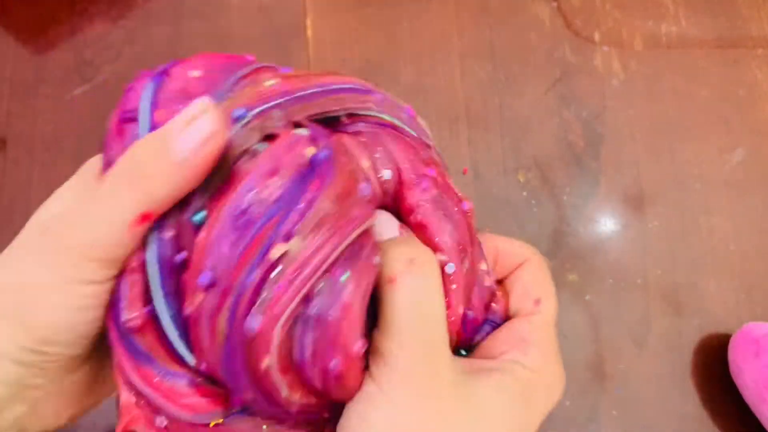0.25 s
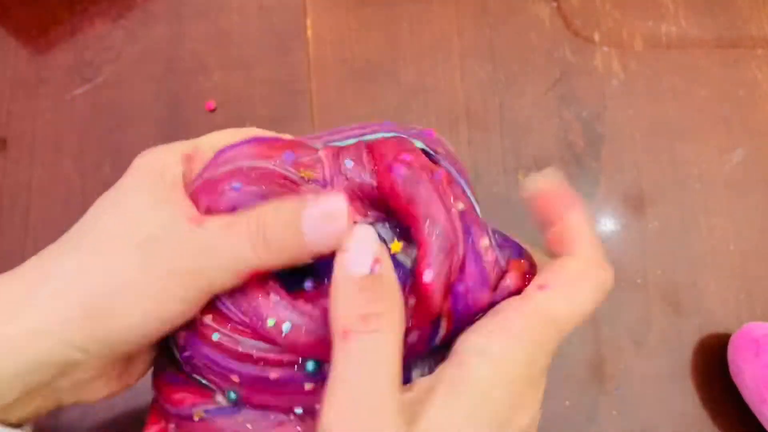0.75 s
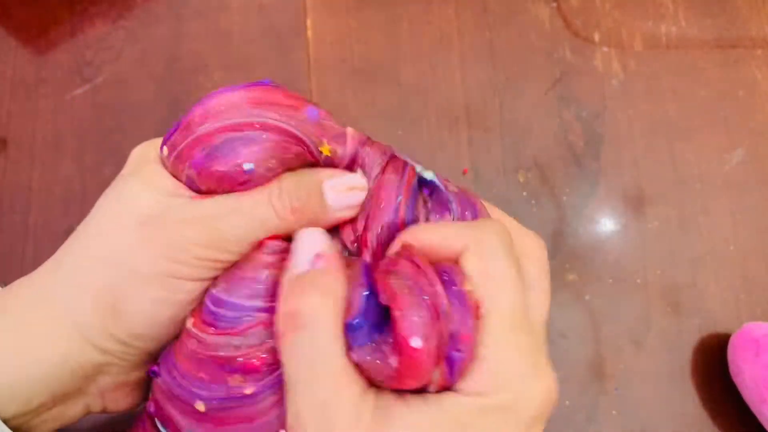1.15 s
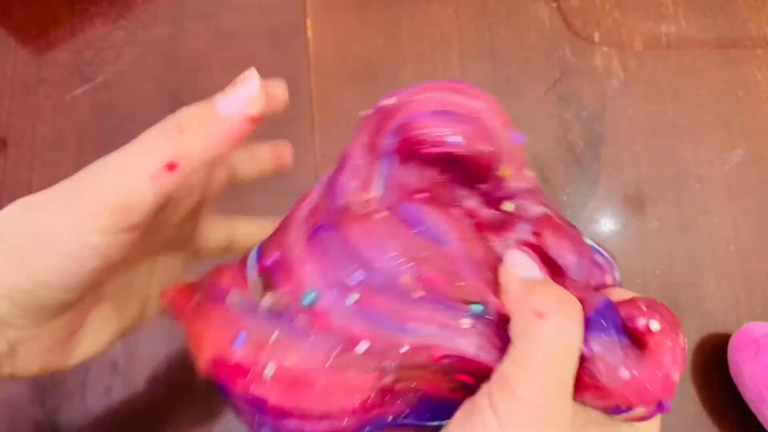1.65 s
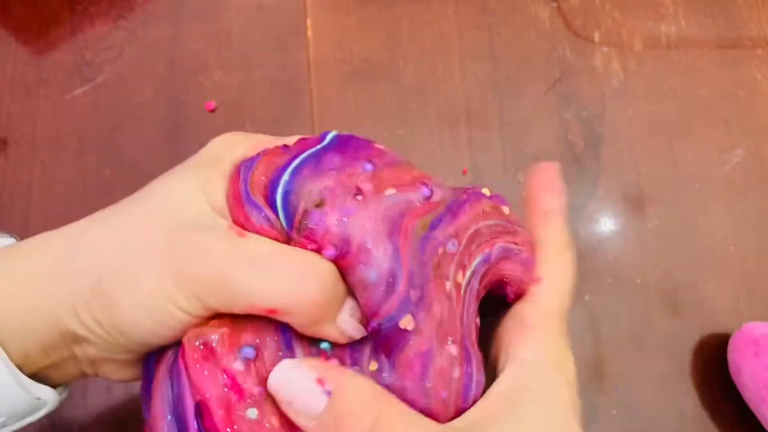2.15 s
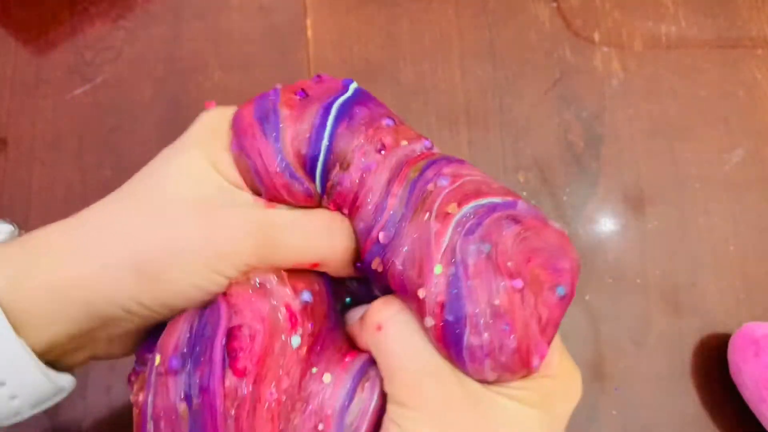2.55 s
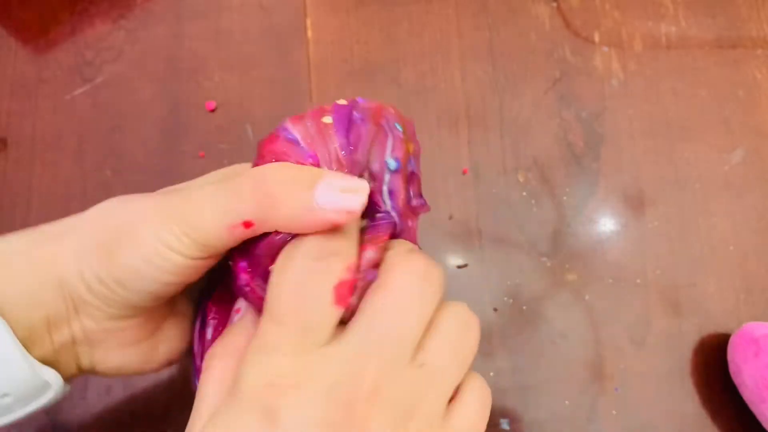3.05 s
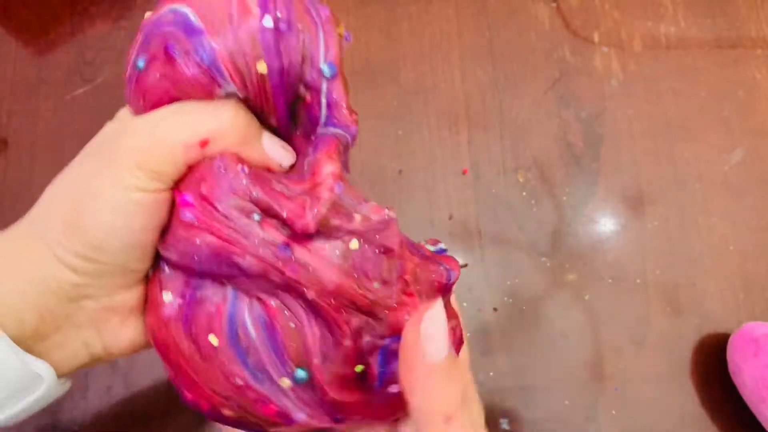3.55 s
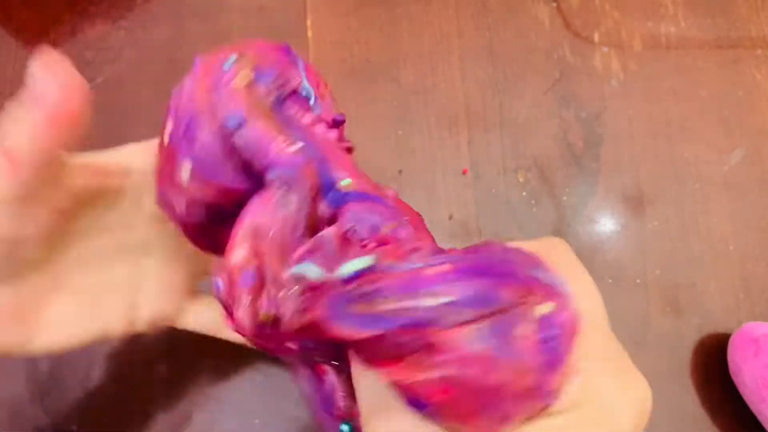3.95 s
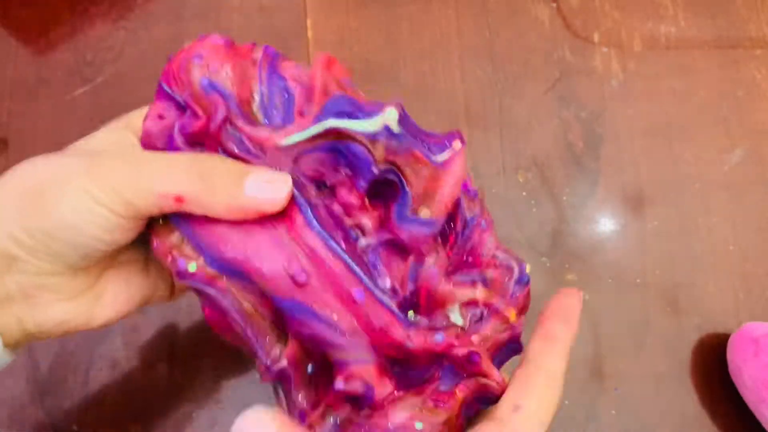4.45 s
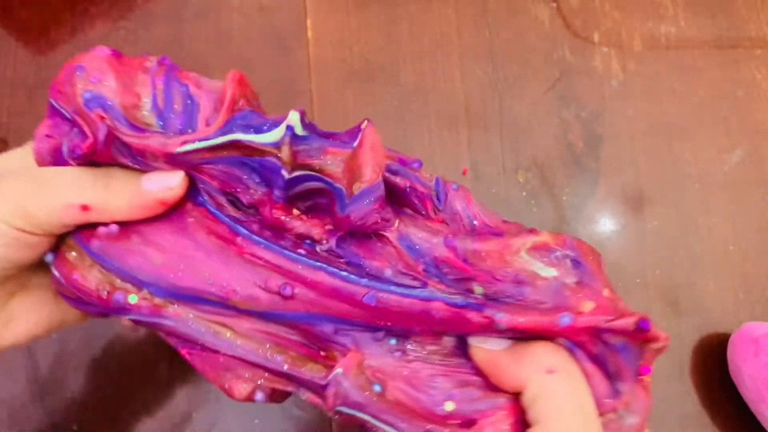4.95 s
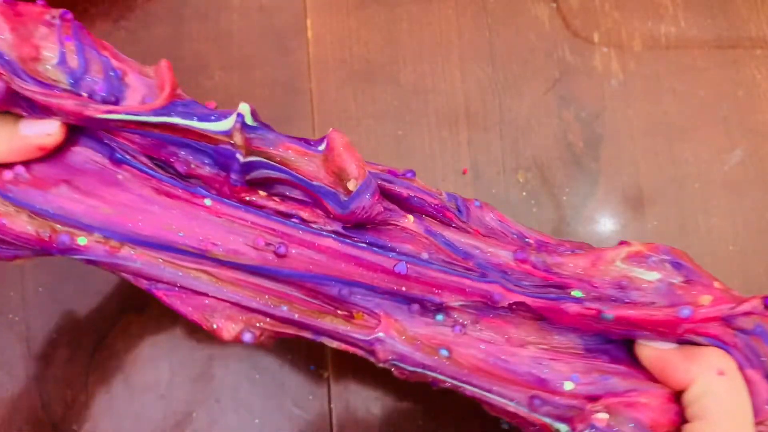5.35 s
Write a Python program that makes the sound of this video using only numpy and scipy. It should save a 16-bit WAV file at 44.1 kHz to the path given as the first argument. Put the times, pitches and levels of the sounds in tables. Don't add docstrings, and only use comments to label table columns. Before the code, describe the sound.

Two hands fold and squeeze a thick, sticky slime very close to a stereo microphone. Thin films snap with tiny bright clicks, trapped air bursts in short hollow pops, and wet folds squelch softly between them. The strongest snaps cluster around one second and again just after three seconds; then activity thins to small ticks and faint crackles as the mass is stretched. The room is quiet and nearly dry, with a very low hush.

```python
import sys
import numpy as np
from scipy import signal
from scipy.fft import rfft, irfft, next_fast_len
from scipy.io import wavfile
from scipy.ndimage import uniform_filter1d, map_coordinates

SR = 44100
rng = np.random.default_rng(int(sys.argv[2]) if len(sys.argv) > 2 else 0)


def ratio(d):
    e = np.asarray(d, float) / 20
    return 10 ** e


def waveform_to_disk(signal):
    frames = np.transpose(np.atleast_2d(signal))
    scaled = np.clip(frames, -1, 1) * 32767
    samples = np.round(scaled).astype(np.int16)
    wavfile.write(sys.argv[1], SR, samples)


N = 246959

# f/Hz, level/dB per Hz
HUSH_SPECTRUM = [(20, -61.5), (32, -17.5), (45, 6), (70, -3.5), (130, -7), (300, -22.5), (800, -41),
                 (2000, -27), (6000, -35), (16000, -63.5)]
# t/s, peak level/dB, brightness f/Hz, after-crackle level/dB
SNAPS = [(.0501, -18, 9500, -37.5), (.0857, -16.5, 11600, -15), (.386, -16, 11900, -53),
         (.4047, -12.5, 12100, -26.5), (.414, -19, 12500, -33.5), (.4226, -17.5, 12700, -31),
         (.5984, -14, 7700, -9.5), (.6481, -19, 7800, -10), (.8874, -5.5, 10800, -33.5),
         (.9144, -14.5, 9700, -33), (.968, -3.5, 13100, -21), (1.0132, -12, 12200, -24),
         (1.062, -9, 13000, -42.5), (1.1853, -6.5, 10400, -20), (1.1985, -1.5, 12600, -26),
         (1.2394, -9, 8400, -15), (1.4591, -16, 10100, -7), (1.4812, -16.5, 9100, -19),
         (1.797, -17, 7000, -15), (2.258, -15, 11700, -24.5), (2.287, -18, 6700, -18.5),
         (2.3965, -15, 7200, -20.5), (2.7573, -14, 8500, -12.5), (2.8642, -7, 10300, -30),
         (3.1415, -3.5, 8500, -17), (3.1827, -3.5, 10400, -24), (3.2036, -13, 12400, -26),
         (3.3389, -10.5, 8500, -15), (3.4383, 0, 12800, -52), (3.5245, -2, 11600, -48)]
# t/s, peak level/dB, brightness f/Hz
RAGGED = [(0.312, -22.5, 10100), (1.0099, -16, 12240), (1.0703, -25, 11500), (1.079, -22, 12100),
          (1.1392, -33.5, 11100), (1.155, -27, 8800), (1.194, -23, 8300), (1.466, -28, 10000),
          (1.473, -14.5, 9800), (1.7625, -24.5, 12100), (1.9064, -27, 11500), (2.062, -24, 11660),
          (2.1391, -25.5, 11830), (2.278, -18.5, 12200), (2.4913, -17.5, 9710), (2.6134, -20, 10500),
          (2.931, -24, 13200), (2.943, -28.5, 9700), (3.6869, -26.5, 10800), (3.726, -22, 7570),
          (3.736, -17, 9440), (3.859, -24, 9750), (4.205, -23, 10500), (4.373, -29.5, 10560),
          (4.412, -26, 8300), (4.5803, -21, 13020), (4.5814, -28.5, 14600), (4.6952, -12.5, 8950),
          (4.6988, -22, 11100), (5.061, -33, 11540)]
# t/s, peak level/dB, brightness f/Hz
CLEAN = [(0.077, -34, 11800), (0.216, -30, 6350), (0.436, -22, 13250), (0.576, -29.5, 11700),
         (0.7735, -22, 10200), (1.17, -22.5, 9030), (1.278, -28, 9100), (1.3327, -24.5, 12160),
         (1.5553, -25, 9800), (1.8, -29, 7300), (1.8512, -28, 10950), (1.8908, -21, 11410),
         (2.2186, -20.5, 8060), (2.3366, -22, 10600), (2.4196, -22, 12080), (2.44, -23.5, 11800),
         (2.4888, -22.5, 11400), (2.5136, -25.5, 10420), (2.887, -31, 10500), (3.144, -28.5, 6700),
         (3.3423, -18.5, 9110), (3.4426, -31.5, 11300), (3.69, -15, 12140), (3.898, -26.5, 10340),
         (3.9279, -30.5, 9050), (4.7971, -22, 10700), (4.8055, -24, 10440), (4.864, -20, 8000),
         (4.9037, -29.5, 10700), (5.464, -40.5, 5280)]
# t/s, peak level/dB
TICKS = [(.0079, -36), (0.2752, -33), (0.426, -26), (0.4334, -37), (0.606, -37), (.832, -37), (1.1207, -40),
         (1.7135, -37), (2.0456, -35.5), (2.245, -34), (3.052, -32), (3.083, -35.5), (3.3206, -40),
         (4.5677, -33.5), (4.662, -37.5), (4.6804, -31), (4.7926, -30), (4.8511, -44.5), (4.9276, -42),
         (4.974, -45), (5.0738, -38.5), (5.0784, -37), (5.0958, -37.5), (5.107, -40), (5.167, -50.5),
         (5.2241, -29.5), (5.226, -34), (5.578, -58),
         (0.196, -39), (0.2344, -37), (0.3667, -30), (0.429, -35), (0.4468, -35.5), (0.5576, -40),
           (0.6044, -33.5), (0.6578, -30.5), (0.7848, -27), (1.1208, -32), (1.141, -26), (1.2289, -28.5),
           (1.3507, -47), (1.6148, -58), (1.6979, -46), (1.7281, -38), (1.9198, -37), (1.9299, -27.5),
           (2.3022, -43), (2.3804, -32.5), (2.4305, -39), (2.48, -40.5), (2.7156, -29), (2.7646, -27.5),
           (2.9312, -43), (3.057, -47.5), (3.0648, -43.5), (3.1189, -31), (3.1829, -18.5), (3.2139, -28.5),
           (3.2295, -34.5), (3.6427, -56.5), (3.6669, -49), (3.7184, -35), (3.8749, -32), (4.2762, -30.5),
           (4.2826, -32), (4.5065, -62.5), (4.5807, -42), (4.7527, -33), (5.1447, -53), (5.424, -59)]
# start t/s, hold t/s, fizz level/dB
PEELS = [(0.023, 0.036, -59), (0.068, 0.0046, -52), (0.272, 0.14, -59.5), (0.603, 0.14, -49),
         (0.972, 0.063, -62), (1.096, 0.17, -53.5), (1.272, 0.083, -61.5), (1.459, 0.0083, -40),
         (1.543, 0.46, -57.5), (1.799, 0.1, -53), (2.053, 0.02, -58.5), (2.26, 0.053, -55.5),
         (2.32, 0.22, -61), (2.547, 0.082, -45), (2.739, 0.0032, -47.5), (2.89, 0.0043, -55),
         (3.135, 0.099, -42.5), (3.345, 0.0041, -54), (3.393, 0.051, -54), (3.529, 0.0082, -56),
         (3.728, 0.1, -47), (4.192, 0.0033, -46), (4.409, 0.0045, -62), (4.596, 0.15, -69),
         (4.7, 0.0056, -47), (4.782, 0.11, -61.5), (4.916, 0.058, -71), (5.094, 0.004, -64.5),
         (5.168, 0.091, -77), (5.427, 0.012, -71)]
# start t/s, hold t/s, squelch level/dB, push over squelch level/dB
FOLDS = [(0.061, 0.02, -54.5, -5.5), (0.196, 0.04, -60.5, -9), (0.305, 0.011, -46.5, -3.5),
         (0.413, 0.022, -64, -1.5), (0.63, 0.032, -46, -22), (0.683, 0.058, -47.5, -6.5),
         (0.902, 0.15, -62, -7.5), (1.106, 0.17, -59, -8.5), (1.35, 0.03, -68.5, -13.5),
         (1.474, 0.015, -41, -9), (1.538, 0.11, -59, -8), (1.795, 0.023, -46, -10.5),
         (1.848, 0.081, -60, -9), (2.051, 0.16, -63, -23.5), (2.25, 0.24, -58, -5), (2.565, 0.054, -49, -4),
         (2.755, 0.013, -60.5, -1.5), (2.874, 0.081, -68, -5.5), (3.058, 0.011, -59.5, -9),
         (3.134, 0.13, -53.5, -5), (3.38, 0.094, -66.5, -12.5), (3.524, 0.012, -61.5, -4),
         (3.68, 0.016, -67, 0.5), (3.724, 0.099, -49.5, -7), (4.003, 0.13, -88, 6.5),
         (4.182, 0.017, -50, -7.5), (4.578, 0.046, -67, -28), (4.683, 0.1, -63, -5.5),
         (4.797, 0.19, -69.5, -8), (4.885, 0.011, -75, -12), (5.078, 0.091, -76, -7.5),
         (5.217, 0.011, -69, -23), (5.434, 0.056, -78, -28)]
# level/dB of fizz, squelch, push
REST_DB = [-78, -87, -86]
# f/Hz, level/dB per Hz
FIZZ_SPECTRUM = [(2500, -26), (4000, 6), (6000, 8), (8000, -1.5), (11000, 6.5), (16000, -5)]
# f/Hz, level/dB per Hz
SQUELCH_SPECTRUM = [(300, -22.5), (700, -10), (1300, -2.5), (2500, -9), (4000, -7.5), (7000, -7)]
# f/Hz, level/dB per Hz
PUSH_SPECTRUM = [(40, -26), (100, -6.5), (200, -3.5), (500, -0.5), (1100, -19)]
# t/s, peak level/dB, cavity f/Hz
POPS = [(.05, -26.5, 2300), (.3076, -29, 1790), (.3126, -29.5, 1700), (.599, -24.5, 1845),
        (.5994, -36.5, 733), (.6489, -32, 1820), (.6867, -45.5, 2140), (.7193, -30, 1400),
        (.7274, -44, 1490), (.9672, -35.5, 2310), (.9802, -34, 2100), (1.0843, -38, 1820),
        (1.0978, -39, 1740), (1.2287, -34.5, 1140), (1.2394, -23, 1350), (1.4636, -25, 1230),
        (1.4762, -23.5, 2400), (1.4845, -29, 2250), (1.763, -37.5, 3470), (1.7953, -27.5, 3750),
        (1.7955, -33, 2000), (1.7956, -29.5, 980), (1.796, -36.5, 577), (1.8575, -38, 1760),
        (2.0617, -35, 2750), (2.2665, -43.5, 1840), (2.4042, -32, 1370), (2.4915, -36.5, 1960),
        (2.758, -46, 2900), (3.1418, -28.5, 2530), (3.2772, -38.5, 2430), (3.338, -38, 4100),
        (3.347, -45.5, 4300), (3.353, -45.5, 3960), (3.3825, -45, 3820), (3.5244, -33.5, 2120),
        (3.728, -43, 2860), (3.7855, -45, 1280), (4.697, -46.5, 626), (4.6995, -42, 4000),
        (0.076, -38.5, 990), (0.2153, -42.5, 1540), (0.297, -45, 1560), (0.9857, -42.5, 1850),
           (1.079, -42, 1860), (1.169, -38, 2020), (1.1749, -38.5, 1900), (1.33, -43, 1370),
           (1.629, -41.5, 1505), (2.303, -42, 3430), (2.388, -36.5, 746), (2.439, -40.5, 1470),
           (2.5494, -41, 980), (2.571, -41, 1970), (2.9442, -42.5, 2180), (3.2154, -48.5, 1710),
           (3.7776, -46, 2550), (3.811, -44.5, 2510), (4.58, -44.5, 1840), (4.6934, -37.5, 1630),
           (4.8328, -43, 1300), (4.8634, -44, 1550), (5.0837, -47.5, 2480), (5.2076, -45.5, 3500),
        (0.0345, -49, 1950), (0.833, -43, 2210), (0.888, -37.5, 2740), (0.8872, -46, 1550),
            (0.9135, -41.5, 2230), (1.0403, -59.5, 2640), (1.089, -43.5, 1590), (1.1097, -48.5, 2010),
            (1.141, -52, 2080), (1.199, -46, 1430), (1.3306, -42, 2170), (1.3535, -52.5, 2294),
            (1.4232, -50, 1053), (2.014, -59, 2100), (2.0455, -47.5, 1640), (2.047, -49, 2630),
            (2.063, -47, 1500), (2.2575, -51, 3000), (2.2566, -50, 1475), (2.2876, -38.5, 1550),
            (2.366, -46, 910), (2.388, -47.5, 2670), (2.395, -52.5, 3160), (2.4268, -44, 3100),
            (2.611, -37, 2340), (2.618, -35, 2660), (2.764, -42, 2446), (2.932, -58, 2254),
            (2.9516, -49.5, 1430), (3.0576, -52.5, 1083), (3.0695, -55, 2030), (3.1416, -36.5, 1075),
            (3.1824, -37, 3180), (3.2341, -35.5, 2720), (3.396, -50.5, 3220), (3.6793, -50, 1280),
            (3.7294, -45, 3170), (1.47, -32.5, 2900), (3.955, -59, 1340), (4.586, -50, 3080),
            (4.6802, -49.5, 1720), (4.769, -51.5, 1600), (4.8523, -49, 1300), (4.879, -53, 1485),
            (4.9052, -55, 840), (4.9113, -51, 1570), (4.9152, -56, 1260), (4.9645, -56, 1850),
            (5.078, -57, 2750), (5.1121, -53, 1830), (5.1863, -53, 3130), (5.3937, -64.5, 2444),
            (5.5202, -64, 1960),
        (0.0502, -28, 5400), (0.076, -37, 4170), (0.0856, -42, 1660), (0.2612, -45, 3950),
             (0.2937, -48, 3330), (0.312, -32, 3930), (0.64, -33, 5720), (0.6553, -37, 5540),
             (0.832, -40.5, 6290), (0.9856, -38, 4740), (1.0412, -56.5, 3900), (1.3305, -39.5, 6000),
             (1.479, -31.5, 4390), (1.5325, -50, 4780), (1.763, -33.5, 3880), (2.048, -42.5, 4130),
             (2.0616, -32, 3750), (2.2453, -41.5, 5310), (2.2573, -30.5, 6140), (2.406, -29.5, 5020),
             (2.427, -55, 3230), (2.44, -42.5, 6350), (2.5136, -38, 4610), (2.5423, -35, 3950),
             (2.6425, -42, 6300), (2.7663, -36, 4660), (2.8641, -23.5, 5770), (2.8868, -48.5, 6490),
             (2.931, -43, 6200), (3.057, -44.5, 6140), (3.0697, -42, 5530), (3.0975, -54, 6140),
             (3.1409, -28.5, 4400), (3.1827, -27.5, 6820), (3.5246, -35, 4220), (4.2778, -43, 5480),
             (4.6377, -43.5, 6440), (4.6801, -50, 5890), (4.8499, -40.5, 4460), (4.988, -59, 3570),
             (5.1934, -46, 3870), (5.226, -51, 2350), (5.364, -56, 5170), (5.395, -60.5, 3890),
             (5.4246, -57, 4050),
        (0.5988, -39.5, 423),
    (0.736, -38.5, 1180),
    (1.022, -43, 4000),
    (1.081, -51.5, 1900),
    (1.2393, -38, 416),
    (1.492, -27.5, 2150),
    (2.643, -37, 1800),
    (3.3205, -55, 1524),
    (3.44, -45, 1137),
    (3.5252, -48, 764),
]
# t/s, peak level/dB, f/Hz
SLUMPS = [
    (0.102, -51, 142),
    (0.307, -35, 194),
    (0.685, -44, 380),
    (0.783, -59, 83),
    (2.759, -47.5, 433),
    (3.676, -47.5, 148),
    (3.83, -47, 212),
    (4.208, -53.5, 110),
]
# t/s, length t/s, start f/Hz, end f/Hz,
# level/dB
LEAKS = [
    (1.084, 0.0067, 8040, 8200, -34),
    (1.091, 0.004, 8800, 10240, -33.5),
    (1.112, 0.0047, 10250, 10570, -29.5),
    (1.113, 0.021, 9700, 10000, -42.5),
    (3.3635, 0.0053, 4000, 4050, -37),
]
# f/Hz, t60 t/s
ROOM = [(300, .25), (12000, .2)]
# f/Hz, share
APART = [(50, .15), (300, .8), (1700, .25), (3200, 1.7), (5000, .58), (6800, .36), (8500, .12)]
# f/Hz, phase/rad
PORT_TWIST = [(60, .2), (350, .6), (2400, 1.7), (5200, 1.13), (7200, .72), (8700, 1.05), (12000, 1.33),
              (15500, 1.4)]
# f/Hz, level/dB
BALANCE_DB = [(200, -2), (1300, 0), (2400, -4), (4400, -1), (8000, 0)]

HUSH_DB = -73
RAGGED_DB, CLEAN_DB, TICK_DB, TICK_HZ = -13, -26, -20, 10500
GRIP_DB_S, LET_GO_DB_S = 481.5, 221.5
FROTH_HZ, FOAM_HZ = 1900, 8300
FROTH_OCTAVES, FROTH_T60_CYCLES = 0.445, 9
PORT_DELAY_S = .000138
STEADY_TOP_HZ = 15800
WEAKER_DB, WAVER_DB = -11.5, 4
LOUD_DB, STRICTER_DB = -60, 3.5


def unit(x):
    return x / np.sqrt(np.mean(x ** 2) + 1e-20)


def along(points, hz):
    f, v = np.transpose(points)
    return np.interp(np.log(hz + 1), np.log(f + 1), v)


def filtered(x, response):
    m = next_fast_len(N + 8192)
    return irfft(rfft(x, m) * response(np.fft.rfftfreq(m, 1 / SR)), m)[..., :N]


def wobble(rate_hz):
    knots = rng.standard_normal(int(N * rate_hz / SR) + 4)
    return map_coordinates(knots, [np.arange(N) * rate_hz / SR])


def scatter(start_s, shapes):
    at = np.round(start_s * SR).astype(int)[:, None] + np.arange(shapes.shape[1])
    return np.bincount(at.ravel(), shapes.ravel(), N + SR)[:N]


def hush():
    shared, *own = rng.standard_normal((3, N))
    pair = shared + filtered(np.array(own), lambda hz: along(APART, hz) / 2 + 0.64 * (hz > 3500))
    coloured = unit(filtered(pair, lambda hz: ratio(along(HUSH_SPECTRUM, hz))))
    return ratio(HUSH_DB + 2.2 * wobble(6)) * coloured


def snaps():
    films = SNAPS + [(*row, RAGGED_DB) for row in RAGGED] + [(*row, CLEAN_DB) for row in CLEAN]
    films = films + [(s, db, TICK_HZ, TICK_DB) for s, db in TICKS]
    s, db, hz, shred_db = np.transpose(films)[:, :, None]
    t = np.arange(-40, 500) / SR
    start_s = s[:, 0] - 40 / SR
    luck = rng.standard_normal((len(films), 542))

    burst = np.exp(-np.abs(t) / np.where(t < 0, .00006, .00011))
    burst = burst + 0.03 * (t > 0) * np.exp(-np.abs(t) / 0.00017)
    click = np.sin(2 * np.pi * 0.92 * hz * t + 3 * luck[:, :1])
    click = click + 0.79 * np.sin(2 * np.pi * 1.19 * hz * t + 3 * luck[:, 1:2])
    click = burst * click
    click = click / np.abs(click).max(axis=1, keepdims=True)

    rags = 2.9 * uniform_filter1d(luck[:, 2:], size=6, axis=1) * np.sin(2 * np.pi * hz * t)
    decay_db = 60 * np.abs(t) / np.where(t < 0, .002, .016)
    shreds = ratio(np.minimum(shred_db, -6) - decay_db) * rags
    shreds = filtered(scatter(start_s, ratio(db) * shreds), lambda f: f < STEADY_TOP_HZ)

    train = scatter(start_s, ratio(db - 1.5) * click) + shreds
    return filtered(train, lambda f: np.clip(f / 5000, 0, 1) ** 3.8 + 0.13 * f / (f + 900))


def strokes(start_s, hold_s, db, rest_db):
    t = np.arange(0, N + 64, 64) / SR
    late = t - start_s[:, None]
    swell_db = GRIP_DB_S * np.maximum(-late, 0)
    fade_db = LET_GO_DB_S * np.maximum(late - np.abs(hold_s)[:, None], 0)
    power = (ratio(db[:, None] - swell_db - fade_db) ** 2).sum(axis=0) + ratio(rest_db) ** 2
    return np.interp(np.arange(N) / SR, t, 10 * np.log10(power))


def crackle(spectrum, rate_hz, spread_db, clumps_db, smooth, patchy_db):
    size = ratio(spread_db * np.minimum(rng.exponential(1, N), 3))
    tears = (rng.random(N) < rate_hz / SR) * size * rng.standard_normal(N)
    z = signal.stft(unit(tears) + smooth * rng.standard_normal(N), nperseg=128)[2]
    field = uniform_filter1d(rng.standard_normal(z.shape), size=3, axis=0)
    field = uniform_filter1d(field, size=6, axis=1)
    mix = signal.istft(z * ratio(patchy_db * unit(field)), nperseg=128)[1][:N]
    return unit(filtered(mix * ratio(clumps_db), lambda hz: ratio(along(spectrum, hz))))


def froth(mid_hz, count):
    when, size = rng.random((count, 2)).T[:, :, None]
    drift = .5 * wobble(9)[(when * N).astype(int)]
    hz = mid_hz * 2 ** (FROTH_OCTAVES * (rng.standard_normal((count, 1)) + drift))
    cycles = np.minimum(hz, STEADY_TOP_HZ) * np.arange(450) / SR
    level = np.sqrt(hz / mid_hz) * ratio(15 * size - 60 * cycles / FROTH_T60_CYCLES)
    onset = 1 - np.exp(-cycles / .5)
    notes = level * onset * np.sin(2 * np.pi * cycles) * np.linspace(1, 0, cycles.shape[1])
    return unit(scatter(when[:, 0] * N / SR, notes))


def kneading():
    start_s, hold_s, fold_db, over_db = np.transpose(FOLDS)
    fizz_db = strokes(*np.transpose(PEELS), REST_DB[0])
    squelch_db = strokes(start_s, hold_s, fold_db, REST_DB[1])
    push_db = strokes(start_s, hold_s, fold_db + over_db, REST_DB[2])
    squelch_db = np.maximum(squelch_db, fizz_db - 9.0)
    clumps = 1.14 * wobble(40) + wobble(160)

    peel = crackle(FIZZ_SPECTRUM, 1600, spread_db=3.0, clumps_db=2.6 * clumps, smooth=1.5, patchy_db=3.5)
    fizz = ratio(fizz_db - 5) * froth(FOAM_HZ, count=3500) + ratio(fizz_db + 1.0) * peel
    slide = crackle(SQUELCH_SPECTRUM, 800, spread_db=-1.5, clumps_db=1.7 * clumps, smooth=1.8, patchy_db=1.5)
    squelch = ratio(squelch_db - 3) * froth(FROTH_HZ, count=2500) + ratio(squelch_db + 0.2) * slide
    push_clumps_db = 2.0 * (clumps + wobble(35))
    shove = crackle(PUSH_SPECTRUM, 120, spread_db=2.0, clumps_db=push_clumps_db, smooth=2.7, patchy_db=-0.5)
    return fizz + squelch + ratio(push_db) * shove


def pops():
    pockets = POPS
    s, db, hz = np.transpose(pockets)[:, :, None]
    t = np.arange(900) / SR
    luck = rng.standard_normal((len(pockets), 900))
    note = np.sin(2 * np.pi * hz * t * (1 + 8 * t))
    note = note + 0.26 * np.sin(2 * np.pi * hz * (2.0 + 0.27 * luck[:, :1]) * t)
    edge = 1 + 1.8 * uniform_filter1d(luck, size=25, axis=1)
    t60_s = .002 + 8 / hz
    onset = 1 - np.exp(-t * hz / 0.59)
    train = scatter((s - 1 / hz)[:, 0], ratio(db + 7.5 - 60 * t / t60_s) * note * edge * onset)
    return filtered(train, lambda f: (1j * f / (450 + 1j * f)) ** 2)


def slumps():
    s, db, hz = np.transpose(SLUMPS)[:, :, None]
    cycles = hz * np.arange(2500) / SR
    swell = cycles * np.exp(-1.3 * cycles)
    note = np.sin(2 * np.pi * cycles * (1 - 0.0095 * cycles))
    return scatter(s[:, 0], ratio(db + 8.0) * swell * note)


def leaks():
    s, length_s, from_hz, to_hz, db = np.transpose(LEAKS)[:, :, None]
    u = np.clip(np.arange(800) / SR / length_s, 0, 1)
    flutter = uniform_filter1d(rng.standard_normal(u.shape), size=40, axis=1)
    phase = 2 * np.pi * np.cumsum(from_hz + (to_hz - from_hz) * u, axis=1) / SR
    return scatter(s[:, 0], ratio(db) * np.sin(np.pi * u) * np.sin(phase + 2 * flutter))


def echoes(x):
    hz, t, z = signal.stft(rng.standard_normal(SR // 3), SR, nperseg=256)
    tail = signal.istft(z * ratio(-60 * t / along(ROOM, hz)[:, None]), SR, nperseg=256)[1]
    return signal.fftconvolve(x, tail / np.linalg.norm(tail))[:N]


def ports(x):
    side = np.array([[.5], [-.5]])

    def response(hz):
        lead = 2 * np.pi * hz * PORT_DELAY_S - along(PORT_TWIST, hz)
        return ratio(side * along(BALANCE_DB, hz)) * np.exp(1j * side * lead)

    return filtered(x, response)


def joint(x):
    sum_diff = np.array([x[0] + x[1], x[0] - x[1]]) / 2
    hz, t, z = signal.stft(sum_diff, SR, nperseg=256)
    band = (hz // 690).astype(int)
    edges = np.flatnonzero(np.diff(band, prepend=-1))
    power = np.add.reduceat(np.abs(z) ** 2, edges, axis=1)[:, band]
    total = power.sum(axis=(0, 1))
    click = total > 4 * signal.medfilt(total, 9)
    power = np.abs(uniform_filter1d(power * ~click, size=7))

    loudness = np.abs(uniform_filter1d((np.abs(z) ** 2).sum(axis=(0, 1)), size=41))
    level_db = 10 * np.log10(loudness + 1e-12)
    strict_db = STRICTER_DB * np.clip((level_db - LOUD_DB) / 8, -1, 1)
    waver_db = WAVER_DB * np.interp(t, np.arange(N) / SR, wobble(12))
    limit = ratio(WEAKER_DB + strict_db + waver_db) ** 2
    keep = (power > limit * power[::-1]) | (hz < 4800)[:, None] | click
    mid, side = signal.istft(z * keep, SR, nperseg=256)[1][:, :N]
    return np.array([mid + side, mid - side])


def scene():
    clicks = snaps()
    wet = pops() + leaks() + slumps() + kneading()
    wet = wet + ratio(-18) * echoes(wet + clicks)
    slime = clicks + filtered(wet, lambda hz: hz < STEADY_TOP_HZ)
    z = signal.stft(slime + clicks, nperseg=128)[2]
    random_phase = np.exp(2j * np.pi * rng.random((2,) + z.shape))
    scattered = signal.istft(z * random_phase, nperseg=128)[1][:, :N]
    air = filtered(hush(), lambda hz: hz < STEADY_TOP_HZ)
    return ports(slime + filtered(scattered, lambda hz: along(APART, hz)) + air)


def roll_off(x):
    return signal.sosfilt(signal.butter(12, 17160, fs=SR, output="sos"), x)


def record(dry):
    mix = joint(filtered(dry, lambda hz: 1 / (1 + (hz / 16500) ** 60)))
    return roll_off(mix)


dry = scene()
out = record(dry)
waveform_to_disk(out)
```